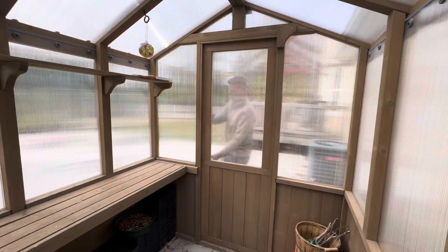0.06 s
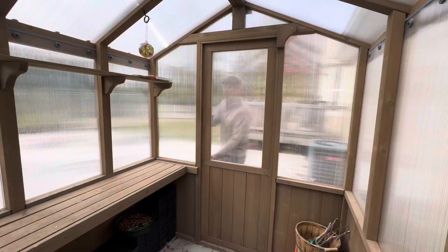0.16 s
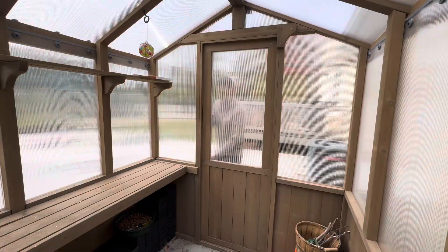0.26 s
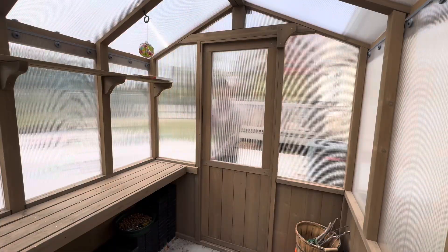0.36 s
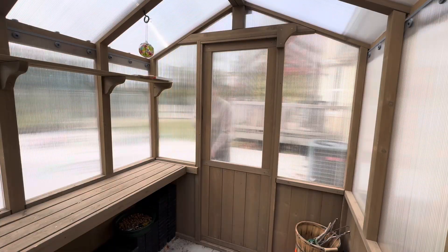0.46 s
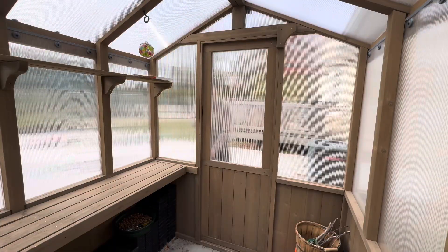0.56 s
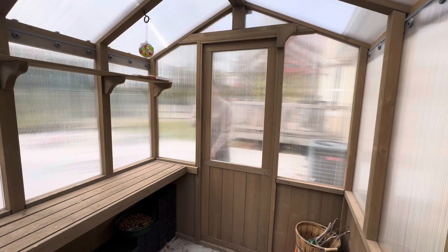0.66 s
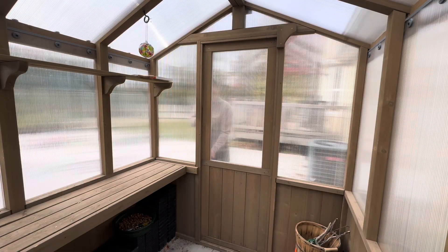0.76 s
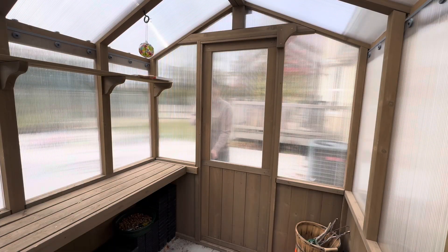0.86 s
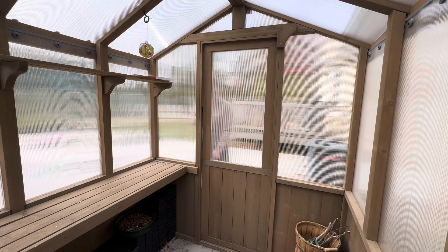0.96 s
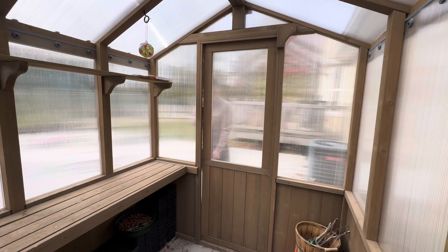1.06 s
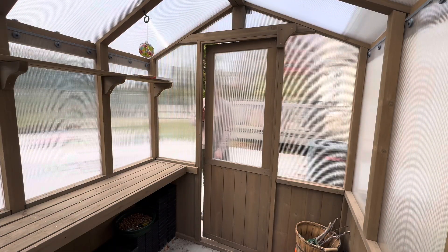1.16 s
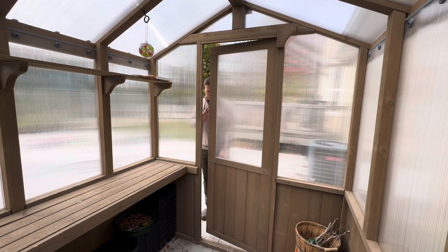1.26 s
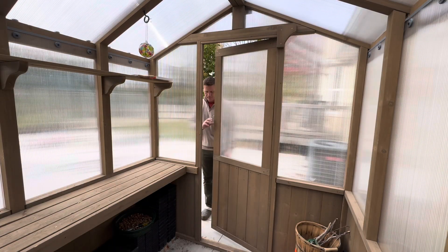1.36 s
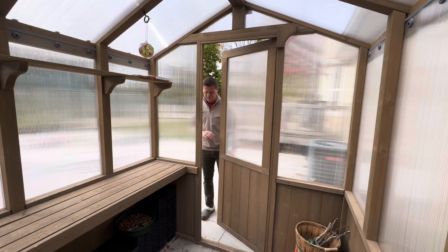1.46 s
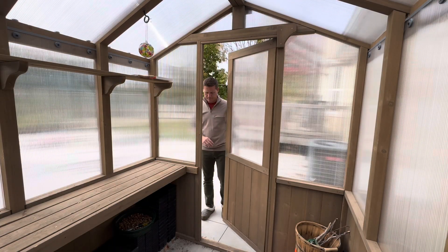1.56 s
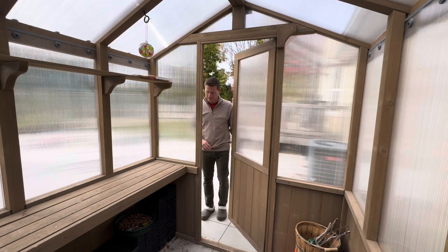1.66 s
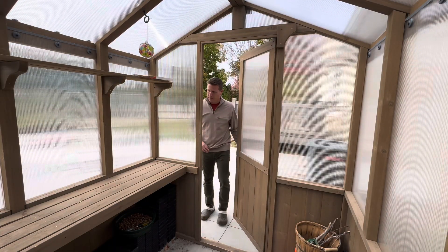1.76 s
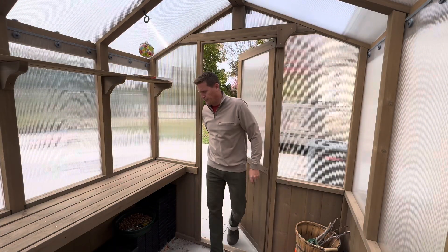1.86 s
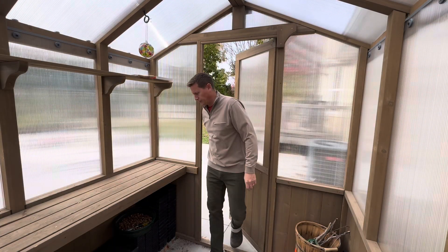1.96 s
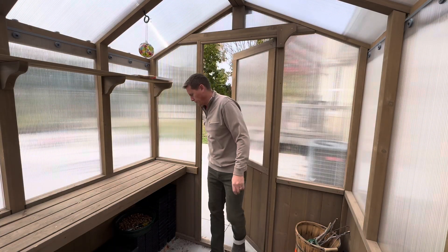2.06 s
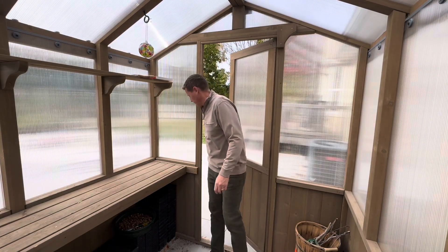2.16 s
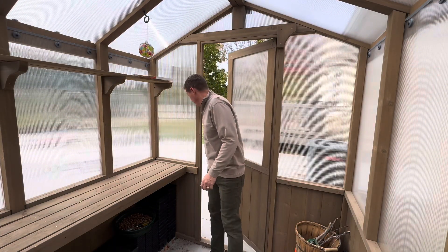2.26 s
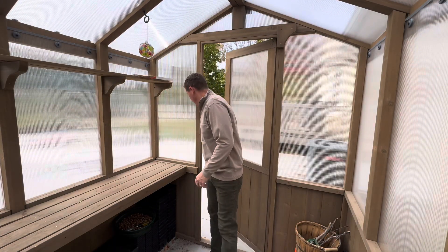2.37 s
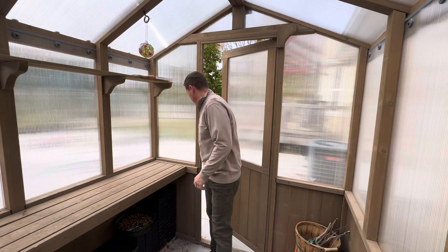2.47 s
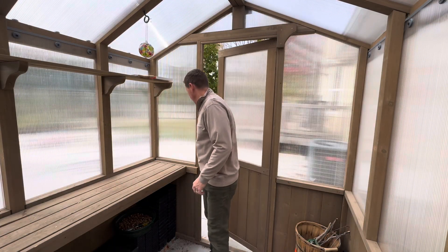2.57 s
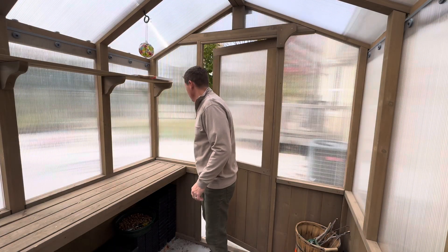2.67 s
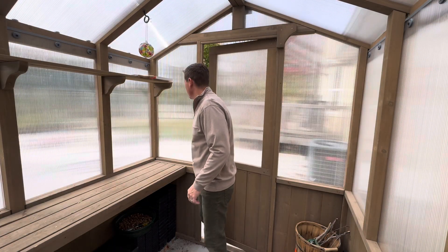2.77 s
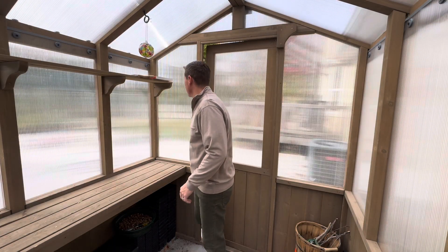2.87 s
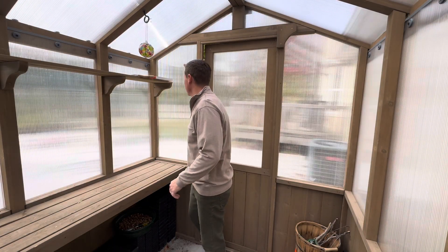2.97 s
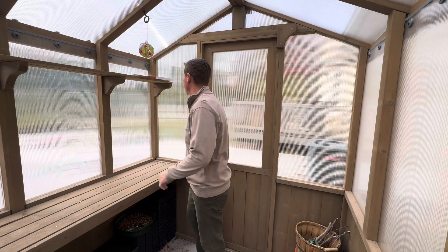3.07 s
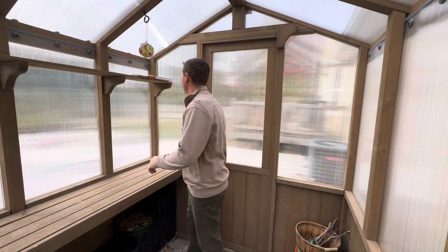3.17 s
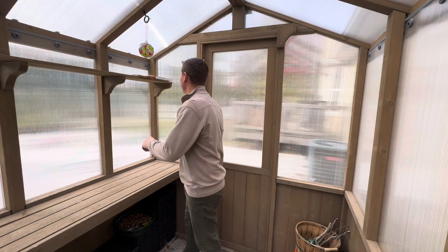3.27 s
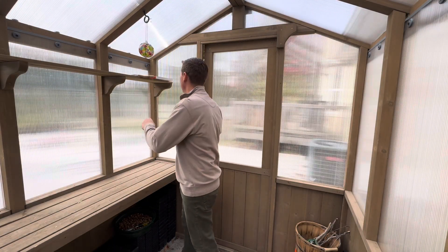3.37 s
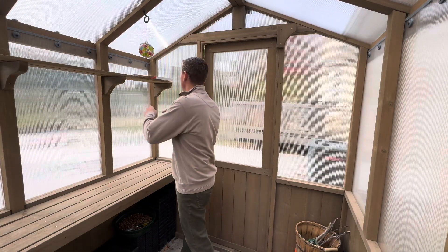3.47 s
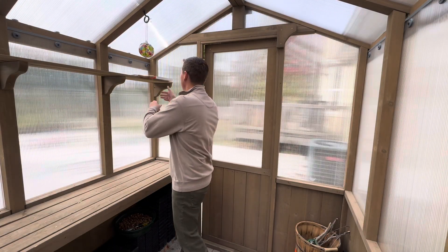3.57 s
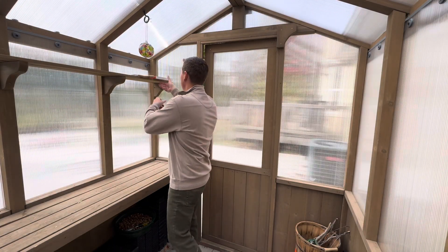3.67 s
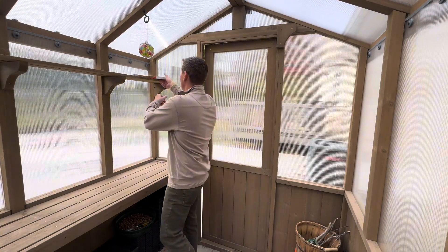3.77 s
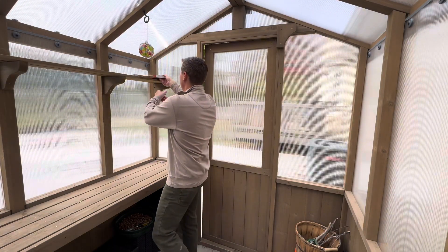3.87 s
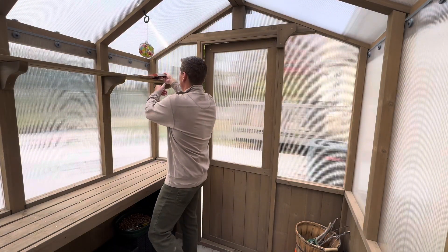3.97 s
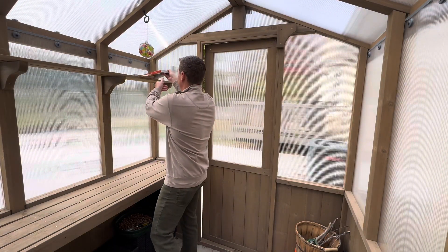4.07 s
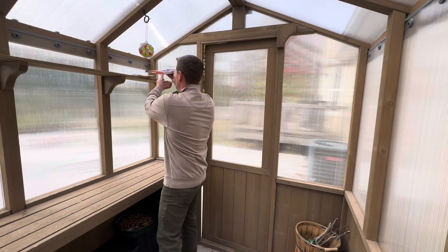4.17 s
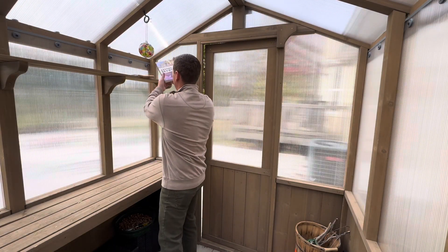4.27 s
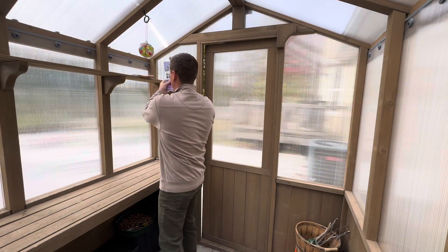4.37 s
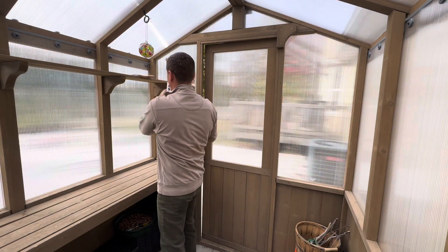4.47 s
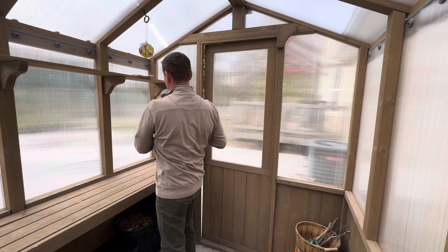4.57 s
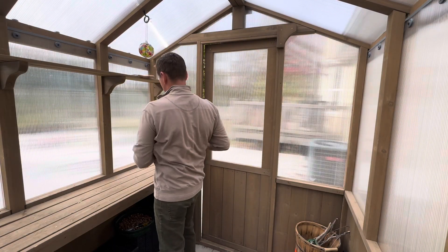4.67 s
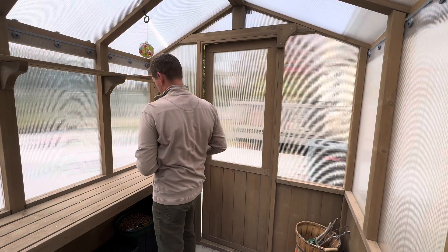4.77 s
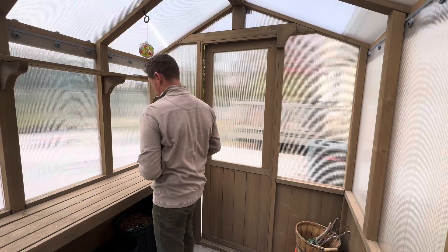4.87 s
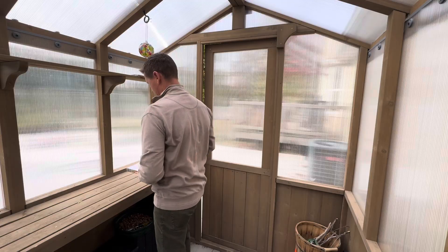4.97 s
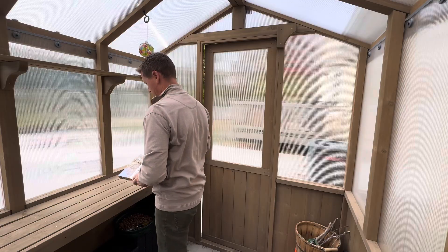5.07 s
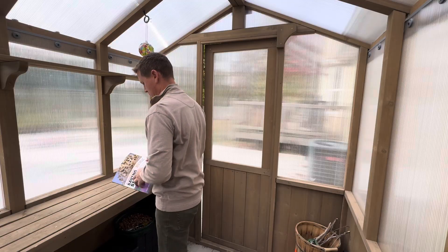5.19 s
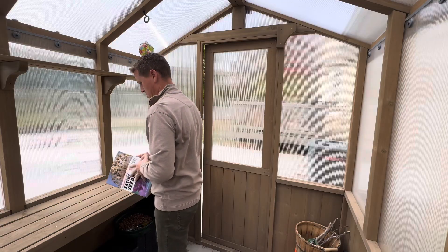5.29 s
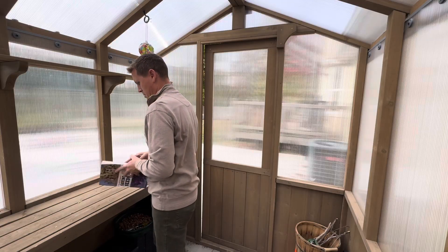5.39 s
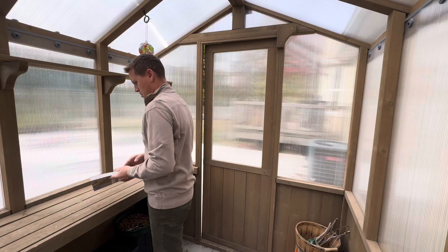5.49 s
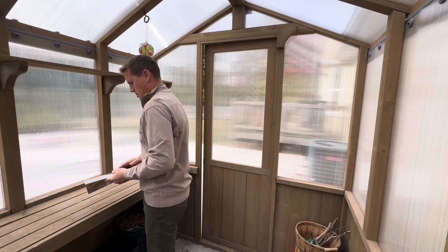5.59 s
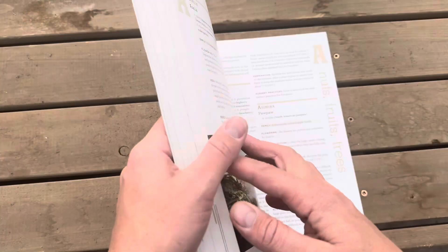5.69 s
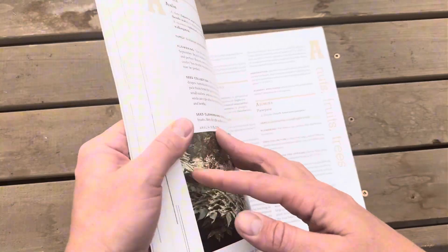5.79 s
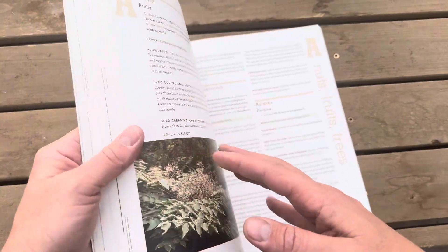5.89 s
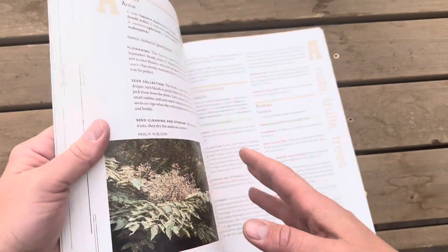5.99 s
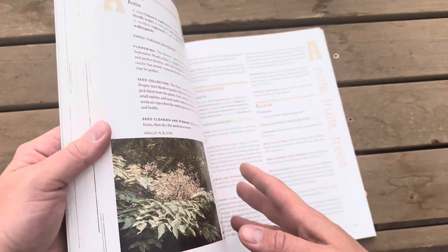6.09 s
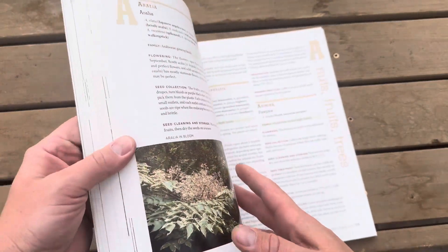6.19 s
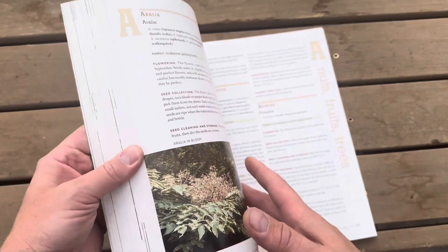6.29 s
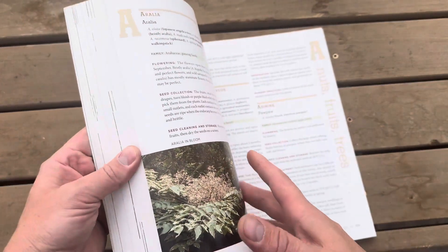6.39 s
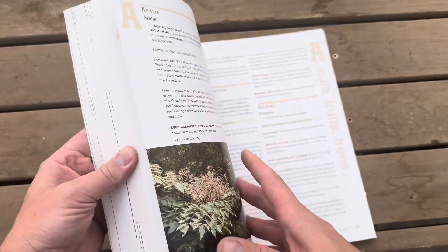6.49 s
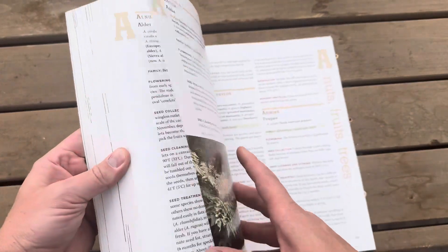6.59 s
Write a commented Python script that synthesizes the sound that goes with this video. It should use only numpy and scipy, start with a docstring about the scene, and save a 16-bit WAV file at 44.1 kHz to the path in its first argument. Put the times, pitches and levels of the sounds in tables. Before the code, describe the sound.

Inside a small wooden greenhouse, a bolt grinds faintly, then clacks free. The sticking door judders open with wooden knocks, a dry scrape and rattling panels. Shoes scuff on paving before the door bangs shut with a deep, ringing boom. Across the room a soft-covered book slides, flicks and wobbles onto a bench. Finally pages brush softly near the microphone over a faint outdoor rumble.

```python
"""A latch is worked inside a small wooden greenhouse; the sticking door shudders open, then bangs shut.
Door and walls ring as struck modes; bolt, handle and door edge grate as trains of stick-slip impulses.
A man scuffs across the paving, slides a soft-covered book off a shelf, flexes it and lays it on the bench:
shaped friction noise, gliding wobbles for the buckling cover and muffled knocks.
Last, its pages brush close to the microphone; a low outdoor rumble of filtered noise lies under it all."""
import sys
import numpy as np
from scipy import signal
from scipy.fft import rfft, irfft, next_fast_len
from scipy.io import wavfile
from scipy.ndimage import uniform_filter1d, map_coordinates

SR = 44100
rng = np.random.default_rng(int(sys.argv[2]) if len(sys.argv) > 2 else 0)


def bounce(signal):
    """Save signal as a 16-bit WAV file at the path given by the first command-line argument."""
    frames = np.transpose(np.atleast_2d(signal))
    limited = np.clip(frames, -1, 1)
    pcm = np.round(limited * 32767).astype(np.int16)
    wavfile.write(sys.argv[1], SR, pcm)


N = 292824
TIME = np.arange(N) / SR  # s from the start of the scene
AGE = TIME[:3 * SR // 2]  # s from the start of one event
CLOSE_S = 5.71  # from here the book is beside the microphone
GRIP_PER_S, GRIP_DB = 170, 2.6  # unevenness of the grip of bolt, handle and door edge

# In all tables rel_db is a level ahead of later gains; density_db is relative power per Hz.
# spectrum of the knocked boards: pitch_hz, density_db
WOOD = [(16, -53), (28, 0), (64, -11.5), (102, -4.5), (156, -6), (193, -10.5), (473, -15), (585, -9.5),
        (847, -17.5), (1190, -17), (2860, -25), (5530, -37.5), (8900, -38), (10700, -67), (15500, -61)]
# how long wood rings at a ring length of 1: pitch_hz, t60_s
DAMPING = [(60, 0.54), (150, 0.56), (300, 0.31), (900, 0.43), (2500, 0.32), (6000, 0.36), (14000, 0.24)]


def amp(db):
    """Decibels to gain."""
    return 10 ** (np.asarray(db) / 20)


def unit(x):
    """Scale to rms 1."""
    return x / np.sqrt(np.mean(x ** 2) + 1e-20)


def along(points, hz):
    """Read (Hz, value) points along a log frequency axis."""
    f, v = np.transpose(points)
    return np.interp(np.log(hz + 1), np.log(f + 1), v)


def level_over_time(points):
    """Gain per sample through (s, dB) points."""
    s, db = np.transpose(points)
    return np.interp(TIME, s, amp(db))


def add(track, s, sound):
    """Mix a sound in at s seconds."""
    part = track[..., max(round(s * SR), 0):][..., :sound.shape[-1]]
    part += sound[..., :part.shape[-1]]


def filtered(x, response):
    """Multiply the spectrum of x by a response of frequency."""
    n = x.shape[-1]
    m = next_fast_len(n + SR // 4)
    return irfft(rfft(x, m) * response(np.fft.rfftfreq(m, 1 / SR)), m)[..., :n]


def band(x, lo_hz, hi_hz):
    """The part of x between two frequencies, with soft edges."""
    return filtered(x, lambda hz: ((1 + (lo_hz / (hz + 1)) ** 6) * (1 + (hz / hi_hz) ** 6)) ** -.5)


def resonances(rows, f):
    """Summed response of resonators (Hz, width Hz, dB) at the frequencies f."""
    return sum(amp(db) * 1j * f * w / (c * c - f * f + 1j * f * w) for c, w, db in rows)


def spread(pair, colour):
    """Two unrelated signals become a coloured stereo field of rms 1, near mono in the bass."""
    # likeness of left and right channels at each pitch: pitch_hz, likeness (-1 to 1)
    alike = [(60, 0.92), (130, 0.99), (290, 0.5), (640, -0.46), (1400, -0.0093), (3100, 0.15),
             (7500, -0.16), (9500, -0.49), (11500, 0.39)]

    def response(hz):
        turn = np.arccos(np.clip(along(alike, hz), -1, 1)) / 2
        return amp(along(colour, hz)) * [np.cos(turn), np.sin(turn)]

    mid, side = filtered(pair, response)
    return unit(np.array([mid + side, mid - side]))


def waver(rate):
    """A smooth random curve, rate knots a second."""
    return map_coordinates(rng.standard_normal(int(N * rate / SR) + 4), [TIME * rate])


def slips(rate, scatter_db):
    """Tiny stick-slip impulses of uneven size, reaching both sides with their own strengths."""
    happens = rng.random(N) < rate / SR
    sizes = happens * amp(scatter_db * np.clip(rng.standard_normal(N), -2, 2))
    return unit(sizes * rng.standard_normal((2, N)))


def strokes(rows, fall_db_per_s, curve):
    """Gain of rubbing strokes (s, rise, hold, dB): each swells, holds and dies away; their powers sum."""
    power = np.zeros(N)
    for s, rise, hold, db in rows:
        swell = np.minimum(AGE / rise, 1) ** curve
        fall_db = fall_db_per_s * np.maximum(AGE - rise - hold, 0)
        add(power, s, (swell * amp(db - fall_db)) ** 2)
    return np.sqrt(power)


def paper_strokes(rows, fall_db_per_s, curve):
    """Gains of the rub and of the hiss that the same strokes drive."""
    rub = [(s, rise, hold, db) for s, rise, hold, db, bright in rows]
    hiss = [(s, rise, hold, db + bright) for s, rise, hold, db, bright in rows]
    return strokes(rub, fall_db_per_s, curve), strokes(hiss, fall_db_per_s, curve)


def dying(colour, damping, length=1):
    """A crowd of modes struck at once, each frequency dying at its own speed."""
    noise = spread(rng.standard_normal((2, len(AGE))), colour)
    hz, t, z = signal.stft(noise, SR, nperseg=512)
    fade = amp(-60 * t / (along(damping, hz)[:, None] * length))
    return signal.istft(z * fade, SR, nperseg=512)[1][:, :len(AGE)]


def struck(x, db, attack):
    """Give a ring its rise (attack in s), and its level over the first 50 ms."""
    x = x * (1 - np.exp(-(AGE / attack) ** 2))
    return amp(db) * x / np.sqrt(np.mean(x[..., :SR // 20] ** 2) + 1e-20)


def ring(modes, attack):
    """Clear modes (Hz, dB, t60 s) struck together; the higher ones reach the two sides out of step."""
    out = np.zeros((2, len(AGE)))
    for hz, db, t60 in modes:
        offset = np.array([[.8], [-.8]]) + .5 * rng.standard_normal((2, 1))
        phase = offset * min(hz / 600, 1) ** 1.5
        tone = np.sin(2 * np.pi * hz * AGE + phase) * amp(-60 * AGE / t60)
        out += struck(tone, db, attack)
    return out


def buzz(hz, width_hz, db, t60):
    """A narrow cluster of modes struck at once."""
    noise = rng.standard_normal((2, len(AGE)))
    cluster = filtered(noise, lambda f: 1 / (1 + ((f - hz) / (width_hz / 2)) ** 4))
    return struck(cluster * amp(-60 * AGE / t60), db, attack=0.004)


def steel(x, share=1):
    """The latch's resonances ring on top of what passes through it."""
    # the latch's resonances: pitch_hz, width_hz, rel_db
    latch_modes = [(753, 16, 13), (854, 12, 13), (1080, 30, 6), (1829, 16, 8), (2062, 18, 9),
                   (3061, 14, 11), (4295, 24, 6), (4655, 24, 8), (5350, 70, 4), (6600, 150, 2)]
    return filtered(x, lambda f: 1 + share * resonances(latch_modes, f))


def room(x):
    """The short, bright answer of the panelled walls."""
    # how long the room rings: pitch_hz, t60_s
    room_damping = [(150, 0.76), (1000, 0.27), (5000, 0.32), (14000, 0.12)]
    flat = [(100, 0.012), (10000, 0.014)]  # pitch_hz, density_db
    tail = dying(flat, room_damping) * (1 - np.exp(-AGE / 0.00075))
    return signal.fftconvolve(np.atleast_2d(x), tail / np.linalg.norm(tail[0]), axes=1)[:, :N]


def door_modes():
    """The door's clearest modes, at new strengths and phases for each blow and side."""
    # door and frame: pitch_hz, rel_db, t60_s (before the extra fade in door())
    mode_rows = [(73, -2, 1.0), (210, -6, .55), (264, -2, .45), (459, -7, .45), (561, -14, .6),
                 (667, -6, .3), (753, -10, .45), (929, -10, .38), (1067, -11, .4), (1210, -8, .35),
                 (1305, -10, .38), (2062, -18, .25)]
    hz, db, t60 = np.transpose(mode_rows)[:, :, None]
    # the sides drift out of phase as pitch rises
    phase = rng.uniform(0, 2 * np.pi, hz.shape)
    phase = phase + rng.standard_normal((2, *hz.shape)) * np.minimum(hz / 500, 2)
    t = AGE[:SR]
    fade = amp(db + rng.normal(0, 1.3, hz.shape) - 60 * t / t60)
    tones = (fade * np.sin(2 * np.pi * hz * t + phase)).sum(1)
    return unit(np.pad(tones, ((0, 0), (0, len(AGE) - SR))))


def door():
    """Each blow thumps the frame, knocks boards, slaps the panel and rattles the latch; the leaf booms."""
    # blows: start_s, rel_db, hardness_db (panel up, thump down), clack_rel_db, ring_length (factor)
    blows = [(0.929, -29, 5.5, -36, 1.25), (0.949, -33, 7.5, -54, 0.63), (1.149, -39, 2, -54.5, 0.94),
             (1.162, -34.5, -2.5, -66, 0.87), (1.203, -39, 3.5, -65, 1.05), (1.222, -35.5, 0.5, -63, 1.1),
             (1.282, -39, -7.5, -69, 0.94), (1.352, -38.5, -8, -71, 0.6), (1.397, -38, -7.5, -78, 1.05),
             (1.472, -33.5, 2, -41.5, 0.89), (1.545, -43.5, -3, -61, .7), (1.666, -40.5, 10.5, -43, 1.25),
             (1.684, -41.5, 8.5, -55, 1.04), (1.755, -42.5, 2, -77, 1.76), (2.015, -55.5, 10, -71, 1.2),
             (2.829, -62, 21, -59, 1.8), (3.11, -28.5, 1.5, -49, 1.32), (3.171, -39.5, 4, -56, 0.67),
             (3.293, -45, -15.5, -54.5, 0.5), (3.342, -43, -10, -72, 0.78), (3.434, -44, -4, -64, 1.75)]
    # the leaf's boom as it is unlatched, comes free, swings out and is shut: pitch_hz, rel_db, t60_s
    unlatched = [(163.5, -34.5, 0.65), (270.5, -25, 0.13), (474, -39, 0.32), (572, -43, 0.54),
                 (736, -34, 0.38), (856, -32.5, 0.33), (1173, -38.5, .22)]
    free = [(130.2, -26.5, 0.57), (209.7, -43, 0.8), (322, -37, 0.97), (493, -42.5, 0.27),
            (683, -46.5, 0.49)]
    swung = [(213, -56, 1.3), (278, -40.5, 0.31), (361, -44.5, 0.85), (480, -42.5, 0.24),
             (554, -47.5, 0.86)]
    shut = [(73, -26, 0.34), (97.1, -27.5, 0.98), (110, -42, 2.3), (115.9, -38.5, 2.7), (165.7, -27, 0.45),
            (267, -32, 0.6), (437.6, -34, 0.41), (485.5, -33, 0.2), (664, -38, 0.4), (758, -40, 0.26),
            (820, -43, 0.43), (1224, -35.5, 0.28), (1323, -42.5, 0.37)]
    thump_db, board_db, panel_db, clack_gain_db = -1.5, 3.5, -5.5, -6.0  # shares of a blow
    out = np.zeros((2, N))
    for s, db, hard_db, clack_db, length in blows:
        clear_modes = door_modes() * amp(-35 * AGE)
        body = unit(dying(WOOD, DAMPING, length)) + amp(-9.5) * clear_modes
        body = steel(body, share=.2)
        add(out, s, struck(band(body, 33, 206), db + thump_db - hard_db, attack=0.011))
        add(out, s - .002, struck(band(body, 196, 457), db + board_db, attack=0.0018))
        add(out, s - .003, struck(band(body, 596, 1820), db + panel_db + hard_db, attack=0.0028))
        add(out, s - .005, struck(band(body, 3900, 15000), clack_db + clack_gain_db, attack=0.0012))
    for s, modes in (.928, unlatched), (1.213, free), (1.668, swung), (3.111, shut):
        add(out, s, ring(modes, attack=0.0056))
    return out


def slam():
    """The shut door heaves the frame and trapped air; the catch rattles home and the walls shake on."""
    # spectrum of the shaken walls: pitch_hz, density_db
    house = [(18, -42), (30, -6.5), (102, -6.5), (234, -14.5), (271, -10.5), (456, -16), (528, -16.5),
             (590, -15.5), (1190, -30), (1430, -35), (2500, -45), (3250, -75), (5500, -120)]
    # how long the walls ring: pitch_hz, t60_s
    house_damping = [(50, 0.39), (90, 2.2), (300, 1.31), (700, 1.13), (1400, 1.17), (3000, 0.2)]
    # what the catch rings with: pitch_hz, width_hz, rel_db, t60_s
    catch_modes = [(1214, 110, 2.5, 0.25), (2010, 150, -5, 0.23), (2650, 320, -4, 0.17)]
    # the catch rattles home: start_s, rel_db
    catch_hits = [(3.148, -44), (3.163, -42), (3.175, -48)]
    t = TIME - 3.1435
    heave = amp(-7.5) * np.exp(-np.abs(t) / 0.0055) * np.sin(-2 * np.pi * 84 * t) * (TIME > 3.11)
    out = np.array([heave, heave])
    # loose panels make the after-ring uneven: 28 knots a second
    shudder = amp(2.2 * waver(28))[:len(AGE)]
    add(out, 3.125, struck(dying(house, house_damping), -29.0, attack=0.016) * shudder)
    # the edge cracks against the stop, then the whole stile lands
    crack = band(dying(WOOD, DAMPING, length=0.95), 1400, 4500)
    add(out, 3.104, struck(crack, -48, attack=0.0023))
    stile = band(dying(WOOD, DAMPING, length=0.23), 710, 1300)
    add(out, 3.111, struck(stile, -31.5, attack=0.0015))
    for s, db in catch_hits:
        for hz, width, level, t60 in catch_modes:
            add(out, s, buzz(hz, width, db + level, t60))
    return out


def latch():
    """The bolt grinds along its keeper in fits, sings unsteadily, and ticks where it catches."""
    # the bolt is pushed along its keeper: start_s, rise_s, hold_s, rel_db
    pushes = [(0.21, 0.035, 0.022, -56.5), (0.35, 0.019, .01, -55.5), (0.44, 0.034, 0.029, -50),
              (0.53, 0.027, 0.082, -55), (0.795, 0.044, 0.0015, -47.5), (0.835, 0.0074, 0.049, -37.5),
              (0.872, 0.032, 0.011, -32)]
    # spectrum of the grinding: pitch_hz, density_db
    bolt_colour = [(71, -23), (120, -16), (225, 3.5), (563, -7), (690, -8.5), (1410, -8), (3170, -15.5),
                   (8950, -18), (10700, -36), (15500, -29)]
    # the bolt sings as it grinds: pitch_hz, width_hz, rel_db
    song_modes = [(733, 82, 0.5), (1202, 40, 1), (1860, 61, -4), (2090, 90, -5), (3060, 55, -5),
                  (3220, 55, -3), (4310, 60, -8), (4920, 65, -9), (5390, 120, -10)]
    # bolt and door edge catch with small clicks: start_s, rel_db
    tick_rows = [(0.839, -46), (0.875, -45), (0.886, -41), (0.929, -27), (0.951, -37), (0.96, -45),
                 (1.149, -36), (1.667, -31.5), (1.749, -39), (1.849, -52)]
    # spectra of the juddering wood and of the ticks: pitch_hz, density_db
    judder_colour = [(150, -9.5), (400, -1), (720, 5), (1300, -9), (3000, -15), (7000, -36)]
    tick_colour = [(200, -4), (900, 9), (2500, 7.0), (7000, -14.0), (10500, -17), (15500, -13)]
    song_db, judder_db = -3.5, -7.5  # against the grinding
    full_pressure = TIME > .75

    grip = amp(GRIP_DB * waver(GRIP_PER_S))
    grind = unit(steel(grip * spread(slips(6000, 1.2), bolt_colour), share=.3))
    song = filtered(grip * slips(900, 2.8), lambda f: resonances(song_modes, f))
    # reading the song at an uneven speed makes its pitch wander
    place = np.cumsum(1 + 0.01198 * waver(22))
    song = np.array([map_coordinates(side, [place], mode="mirror") for side in song])
    song = unit(song) * full_pressure
    # coarse catches of the bolt knock the wood, 130 a second
    wood = dying(judder_colour, [(200, .035), (3000, .012)])  # damping: pitch_hz, t60_s
    judder = signal.fftconvolve(slips(130, 2), wood, axes=1)[:, :N]
    judder = unit(judder) * full_pressure
    push = strokes(pushes, fall_db_per_s=175, curve=1.0)
    slide = push * (grind + amp(song_db) * song + amp(judder_db) * judder)

    force = np.zeros(N)
    for s, db in tick_rows:
        add(force, s - .001, amp(db - 60 * AGE / .016))
    ticks = steel(force * spread(rng.standard_normal((2, N)), tick_colour), share=0.34)
    return amp(-3.0) * slide + ticks + amp(-8.5) * room(slide + ticks)


def rasps():
    """Handle and door edge grate in brief, uneven runs of slips that stop dead."""
    # dry rasps: start_s, end_s, rel_db, change_db (by the end), shrill_rel_db (at the start)
    rasp_rows = [(0.428, 0.458, -29, 4.5, -51), (1.748, 1.85, -33, -7, -37)]
    # spectrum of the grating: pitch_hz, density_db
    rasp_colour = [(88, -41), (150, -6), (471, 0.5), (643, 0), (796, 0.5), (1000, 1), (1170, 7),
                   (1730, -8.5), (2060, -12), (2650, -15.5), (4060, -18), (6470, -18.5), (9360, -21.5),
                   (10700, -42), (15500, -43)]
    # spectrum of the shrill scrape: pitch_hz, density_db
    shrill_colour = [(400, -25), (700, 12), (1100, -2), (1330, 7), (1550, 8), (1850, 3), (2030, 7),
                     (2250, -8), (2620, 3), (3300, -13), (4800, -22), (5600, -15), (6400, -18), (7100, -30),
                     (9000, -30), (11000, -45), (15500, -40)]
    force, shrill = np.zeros(N), np.zeros(N)
    for start, end, db, change_db, shrill_db in rasp_rows:
        u = (TIME - start) / (end - start)  # progress through the run
        run = (u > 0) & (u < 1)
        force += amp(db + change_db * np.clip(u, 0, 1)) * run
        shrill += amp(shrill_db - 3 * np.clip(u, 0, 1)) * run
    grip = unit(amp(GRIP_DB * waver(GRIP_PER_S)))
    grate = grip * uniform_filter1d(force, SR // 200) * spread(slips(10000, 1.0), rasp_colour)
    screech = grip * uniform_filter1d(shrill, SR // 300) * spread(slips(4300, 1.7), shrill_colour)
    loose = room(band(grate * (TIME > 1), 100, 1430))  # once open, the door leaf rings along
    return grate + screech + amp(0.5) * loose + amp(-24.0) * room(grate)


def leaf():
    """Soft rubs of the door leaf as sparse slips; the first stroke is a distant sound fading."""
    # soft rubs of the leaf, the first a distant sound fading: start_s, rise_s, hold_s, rel_db
    rubs = [(0.005, 0.026, 0.044, -57.5), (0.23, 0.028, 0.11, -54.5), (0.31, 0.12, .005, -42),
            (1.585, 0.069, 0.0044, -39.5), (2.87, 0.13, 0.075, -50.5)]
    # spectrum of the soft rub: pitch_hz, density_db
    swing_colour = [(110, -46), (180, 1.5), (331, -3.5), (408, -14), (435, -7.5), (923, -10.5),
                    (1200, -11.5), (1470, -17), (4000, -38), (5200, -70), (8800, -120)]
    return strokes(rubs, fall_db_per_s=333, curve=1.0) * spread(slips(1200, 0.67), swing_colour)


def fittings():
    """A loose panel edge and small metal parts buzz whenever they are jolted."""
    # lower and upper cluster of the panel edge: pitch_hz, width_hz, rel_db, t60_s (at ring length 1)
    panel_edge = [(1210, 390, -1, 0.43), (2060, 1560, -8.5, 0.43)]
    # the panel edge chatters: start_s, rel_db, upper_gain_db, ring_length (factor)
    chatters = [(1.47, -47.5, 8.5, 0.66), (1.746, -33.5, 5, 0.55), (2.013, -52.5, -9, 0.6),
                (2.826, -44.5, -2.5, 0.42), (3.11, -36.5, -13, 1.4), (3.16, -50.5, 9, 1.4),
                (3.885, -50, 1, 0.2)]
    # small metal parts are jolted: start_s, pitch_hz, width_hz, rel_db, t60_s
    clinks = [(0.925, 4860, 2200, -38.5, 0.34), (0.928, 6700, 600, -46, 0.21),
              (0.96, 4570, 1200, -51, 0.22), (1.662, 4880, 480, -47.5, 0.25), (1.663, 5530, 300, -53, .35),
              (1.664, 3200, 300, -56, 0.35), (1.664, 2180, 300, -49.5, .3), (1.678, 1310, 110, -43, 0.32),
              (1.68, 750, 70, -43.5, 0.24), (1.747, 6050, 1100, -47, 0.19)]
    out = np.zeros((2, N))
    for s, db, upper_db, length in chatters:
        for k, (hz, width, level, t60) in enumerate(panel_edge):
            add(out, s, buzz(hz, width, db + level + k * upper_db, t60 * length))
    for s, hz, width, db, t60 in clinks:
        add(out, s, buzz(hz, width, db, t60))
    return out


def book():
    """The book rubs and hisses as it slides, and its soft cover buckles with a hollow wobble."""
    # slides on shelf, hand and bench: start_s, rise_s, hold_s, rub_rel_db, hiss_over_rub_db (before gains)
    slides = [(3.725, 0.0099, 0.096, -58.5, -1), (3.79, 0.034, 0.19, -55.5, -3),
              (4.016, 0.0028, 0.012, -50.5, 1), (4.146, 0.026, 0.011, -44, -1),
              (4.36, .035, 0.026, -68, 6.5), (4.52, 0.1, 0.036, -68.5, 4), (4.615, 0.0084, 0.1, -64, -1),
              (4.735, 0.024, 0.022, -55.5, 0), (4.803, 0.037, 0.043, -51.5, 4.5),
              (4.9, 0.019, 0.054, -56.5, 4.5), (5.035, 0.048, 0.015, -52.5, 4),
              (5.237, 0.05, 0.028, -50, 4), (5.4, 0.072, 0.11, -72, 7), (5.6, 0.13, .01, -63, 8.5)]
    # spectrum of the rub: pitch_hz, density_db
    rub_colour = [(150, -13), (250, -18), (462, -6), (497, -16), (534, -5.5), (768, -4.5), (1110, -3.5),
                  (3000, -13), (3900, -26), (6600, -120)]
    # spectrum of the hiss: pitch_hz, density_db
    hiss_colour = [(1470, -19), (2500, -13), (3270, -6.5), (3910, -4.5), (6310, -4), (8930, -4.5),
                   (9950, -7), (10800, -24.5), (15000, -10.5), (15800, -16.5)]
    # the cover buckles: start_s (peak), pitch_hz (at the peak), glide_octaves_per_s, rel_db, length_s
    flexes = [(4.632, 475, -35, -38.5, 0.012), (4.637, 320, -1, -42, 0.014), (4.755, 533, -4, -39, 0.0066),
              (4.77, 563, 24, -40.5, 0.018), (4.808, 650, -3, -47, 0.0086)]
    # spectrum of the fluttering cover: pitch_hz, density_db
    flutter_colour = [(120, -30), (280, -9.0), (560, -1), (850, -13.5), (1600, -19.0), (3000, -39)]

    rub, hiss = np.array(paper_strokes(slides, fall_db_per_s=186, curve=0.36)) * (TIME < CLOSE_S)
    # across the room the fibres' tiny slips blur into a smooth rush
    fibres = rng.standard_normal((2, 2, N))
    # the paper catches and lets go unevenly
    fibres = fibres * amp(0.9 * waver(90))
    # 420 crackles a second in the hiss
    fibres[1] += amp(-7.5) * slips(420, scatter_db=4)
    sliding = amp(3.5) * rub * spread(fibres[0], rub_colour)
    sliding += amp(1.5) * hiss * spread(fibres[1], hiss_colour)

    wobble, shake = np.zeros(N), np.zeros(N)
    for s, hz, glide, db, length in flexes:
        t = TIME - s
        cycles = hz * t * (1 + glide * np.log(2) * t / 2)
        wobble += amp(db) * np.exp(-(t / length) ** 2) * np.sin(2 * np.pi * cycles)
        add(shake, s - length, amp(db - 60 * AGE / 0.28) * (1 - np.exp(-AGE / 0.004)))
    flutter = shake * spread(rng.standard_normal((2, N)), flutter_colour)
    return sliding + amp(-5.0) * wobble + amp(-7.0) * flutter


def cover():
    """The glossy cover drags with a low scuff of stick-slip, and paper squeaks faintly on paper."""
    # drags over hand and bench: start_s, rise_s, hold_s, rel_db
    drags = [(4.63, .01, .015, -59), (4.76, 0.023, .025, -58), (5.34, 0.058, .025, -53),
             (5.435, .018, 0.017, -56), (5.48, 0.011, 0.017, -61)]
    # spectrum of the drag: pitch_hz, density_db
    drag_colour = [(200, -16), (370, -3), (580, 1.5), (760, -10), (1200, -16.5), (2500, -29), (5000, -62)]
    # paper squeaks: start_s, pitch_hz, width_hz, rel_db, t60_s
    squeaks = [(5.112, 4050, 480, -58, 0.43), (5.113, 6450, 1200, -54, .24)]
    out = strokes(drags, fall_db_per_s=200, curve=.7) * spread(slips(500, 1.6), drag_colour)
    for s, hz, width, db, t60 in squeaks:
        add(out, s, buzz(hz, width, db, t60))
    return out


def flicks():
    """Paper edges snap past each other; from close by the room falls away."""
    # paper edges flick: start_s, rel_db
    snaps = [(3.884, -44), (4.016, -43), (4.154, -43.5), (4.81, -46.5), (5.113, -41), (5.239, -47.5),
             (6.312, -53), (6.447, -53), (6.519, -69), (6.542, -52)]
    # spectrum of a snap: pitch_hz, density_db
    snap_colour = [(200, -5), (900, 1.5), (2500, -10.5), (6000, 7.0), (11000, -1.5), (15000, -1)]
    force = np.zeros(N)
    for s, db in snaps:
        t60 = .06 if s < CLOSE_S else .035
        add(force, s - .001, amp(db - 60 * AGE / t60))
    snap = force * spread(rng.standard_normal((2, N)), snap_colour)
    return snap + amp(0.5) * room(snap * (TIME < CLOSE_S))


def pages():
    """Pages brush over each other close by and dry, as dense slips that catch unevenly."""
    # brushes: start_s, rise_s, hold_s, rustle_rel_db, hiss_over_rustle_db (before gains)
    brushes = [(5.71, 0.054, 0.11, -61, 0), (5.825, 0.042, 0.071, -54.5, -10), (6, 0.017, 0.082, -64, -3.5),
               (6.14, 0.027, 0.036, -73, 9), (6.25, 0.021, .005, -68, -2), (6.302, 0.004, 0.006, -57, -2),
               (6.36, 0.023, 0.11, -84, 15), (6.518, .003, 0.027, -57.5, -11), (6.55, 0.047, .06, -49, -18)]
    # spectrum of brushed paper: pitch_hz, density_db
    page_colour = [(180, 13), (300, 3.5), (418, -9.5), (502, -14.5), (785, -6.5), (1090, -16),
                   (1210, -11.5), (4710, -19.5), (6350, -13.5), (8840, -13), (10800, -7), (15800, -15.5)]
    rustle, hiss = paper_strokes(brushes, fall_db_per_s=188, curve=0.37)
    catching = amp(1.5 * waver(110))
    fibres = catching * spread(slips(9000, 0.97), page_colour)
    brush = amp(1.5) * rustle * unit(band(fibres, 430, 4600))
    brush += amp(-4.0) * hiss * unit(band(fibres, 5500, 20000))
    return brush * amp([[-1], [1]])  # left and right dB, ahead of the lean in record()


def bumps():
    """Soft contacts of feet, hands and book with floor, shelf and bench: a damped thud and a knock."""
    # bumps: start_s, thud_rel_db, knock_rel_db
    bump_rows = [(0.099, -38.5, -58), (2.049, -46, -44.5), (2.9, -45, -44), (4.029, -46, -38),
                 (4.149, -66, -40.5), (5.34, -61, -41), (5.831, -52, -38.5), (5.879, -71, -39.5),
                 (6.0, -71, -52), (6.15, -52.5, -63)]
    # spectrum of a bump: pitch_hz, density_db
    bump_colour = [(21, -41), (35, -4), (107, 0), (286, -28), (327, -21.5), (362, -29), (474, -21.5),
                   (516, -39), (612, -26.5), (2000, -39), (2600, -51), (4400, -120)]
    out = np.zeros((2, N))
    for s, thud_db, knock_db in bump_rows:
        body = dying(bump_colour, DAMPING)
        add(out, s, struck(band(body, 35, 160), thud_db - 3.0, attack=0.011))
        add(out, s, struck(band(body, 248, 2200), knock_db - 10.5, attack=0.0016))
    return out


def shoes():
    """Soles touch down and drag over grit, a dense train of slips."""
    # shoes scuff the paving: start_s, rise_s, hold_s, rel_db
    scuffs = [(1.15, .005, 0.12, -65), (1.87, 0.018, 0.08, -73), (2.043, 0.011, 0.072, -67.5),
              (2.225, 0.035, 0.016, -66), (2.39, 0.0045, 0.023, -62), (2.41, 0.027, 0.031, -54.5),
              (2.585, 0.008, .005, -64), (2.65, 0.016, 0.2, -67), (2.852, 0.0035, 0.01, -51.5),
              (2.94, 0.044, 0.014, -62), (3.145, 0.059, 0.026, -42), (3.47, .008, 0.011, -62),
              (3.53, 0.048, 0.11, -68.5)]
    # spectrum of the grit: pitch_hz, density_db
    grit_colour = [(350, -45), (600, -6.5), (1080, -4), (2630, -14.5), (7860, -11.5), (8650, -10.5),
                   (12200, -29.5), (12900, -24), (15800, -24.5)]
    drag = strokes(scuffs, fall_db_per_s=164, curve=0.4)
    return amp(2.5) * drag * spread(slips(7000, 0.67), grit_colour)


def high_hisses():
    """Faint, very high hisses: filtered noise, the same on both sides, in short swells."""
    # faint, very high hisses from the door's opening onwards: start_s, rise_s, hold_s, rel_db
    later_hisses = [(2.391, .004, .075, -61), (3.16, 0.031, 0.036, -54), (4.37, 0.015, 0.024, -63),
                    (5.58, 0.08, .025, -55), (5.76, .07, .08, -66)]
    # faint, very high hisses while the bolt is worked: start_s, rise_s, hold_s, rel_db
    bolt_hisses = [(0.212, .005, 0.031, -78), (0.368, .003, .005, -69), (0.47, .1, .05, -67.5)]
    # spectrum of the hisses: pitch_hz, density_db
    high_colour = [(5000, -40), (9000, -8), (12000, -6.5), (14500, 0), (15800, -3)]
    fizz = unit(filtered(rng.standard_normal(N), lambda hz: amp(along(high_colour, hz))))
    return strokes([*later_hisses, *bolt_hisses], fall_db_per_s=190, curve=0.39) * fizz


def outdoors():
    """A distant low rumble with a trace of hiss; beside the book, air stirs at the microphone."""
    # spectrum of the outdoor air: pitch_hz, density_db
    outdoor_colour = [(13, -42.5), (22, -9.5), (85, -0.5), (139, -13), (335, -28.5), (374, -30),
                      (705, -26.5), (832, -29), (2060, -38), (2430, -47), (2640, -42), (3030, -43.5),
                      (8870, -45.5), (10200, -53.5), (15800, -59)]
    # level of the rumble: time_s, rel_db
    rumble_level = [(0, -46), (0.8, -52), (2.1, -50), (2.7, -53), (5.5, -54.5), (6.64, -57.5)]
    # level of the faint hiss: time_s, rel_db
    air_level = [(0, -76), (0.8, -68.5), (1.5, -65.5), (2.3, -67), (3.6, -66), (6.64, -66)]
    air = spread(rng.standard_normal((2, N)), outdoor_colour)
    rumble = level_over_time(rumble_level) * unit(band(air, 22, 374))
    hiss = level_over_time(air_level) * unit(band(air, 300, 20000))
    stir = unit(band(rng.standard_normal(N), 28, 62))
    breeze = amp(-58.5 + 2 * waver(8)) * (TIME > CLOSE_S) * stir
    return rumble + hiss + band(breeze, 20, 120)  # the band softens the breeze's onset


def walls(x, share, reach, count=12):
    """Near panels throw back weak copies within reach seconds that comb the middle and treble."""
    echoes = np.zeros((2, SR // 20))
    for side in echoes:
        places = (rng.uniform(.0005, reach, count) * SR).astype(int)
        side[places] = rng.choice([-1, 1], count) / np.sqrt(count)
    direct = band(x, 460, 10500)
    echoed = signal.fftconvolve(direct, echoes, axes=1)[:, :N]
    return x - direct + (direct + share * echoed) / np.hypot(1, share)


def scene():
    """All sources together; the panels echo the first group, heard across the room."""
    across = door() + slam() + latch() + rasps() + leaf() + shoes() + book()
    unechoed = fittings() + bumps() + flicks() + cover() + high_hisses() + pages()
    return walls(across, share=0.59, reach=.009) + unechoed + outdoors()


def record(dry):
    """The left channel is louder at most pitches; the deepest bass and all above 15.9 kHz are cut."""
    # lean between the channels: pitch_hz, left_minus_right_db
    lean = [(60, 4), (110, 4.5), (220, -1), (700, 4), (1300, 2.5), (2400, 3), (4400, 10), (8000, 5.5),
            (14000, -1)]

    def response(hz):
        sides = amp(np.outer([.5, -.5], along(lean, hz)))
        bass = (1 + (39 / (hz + 1)) ** 8) ** -.5
        return sides * bass * (hz < 15900)

    return filtered(dry, response)


dry = scene()
out = record(dry)
bounce(out)
```